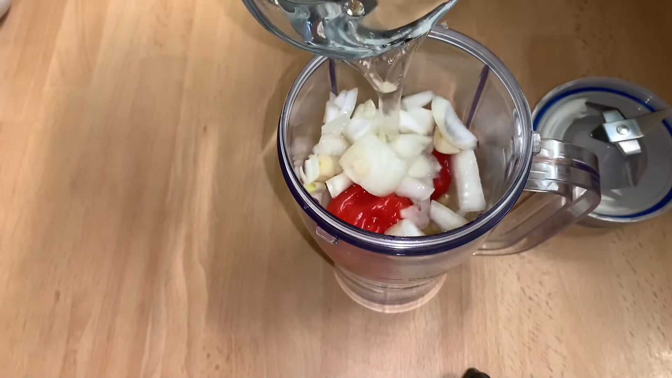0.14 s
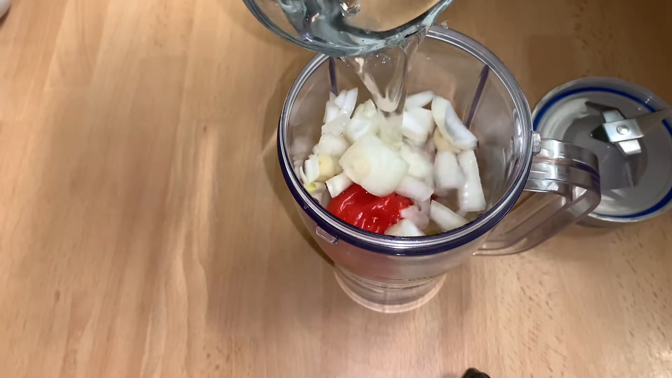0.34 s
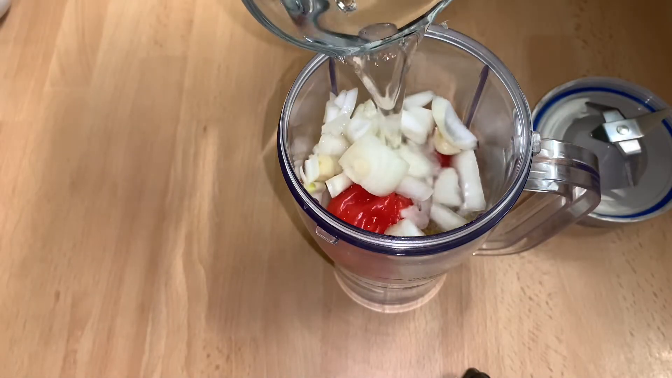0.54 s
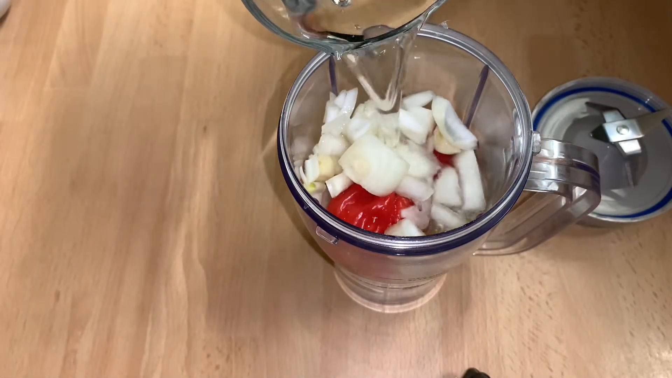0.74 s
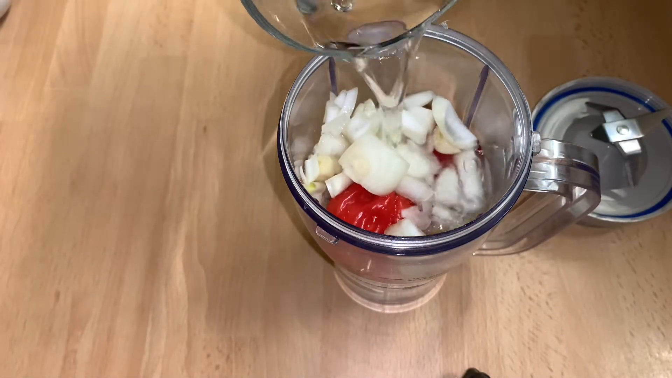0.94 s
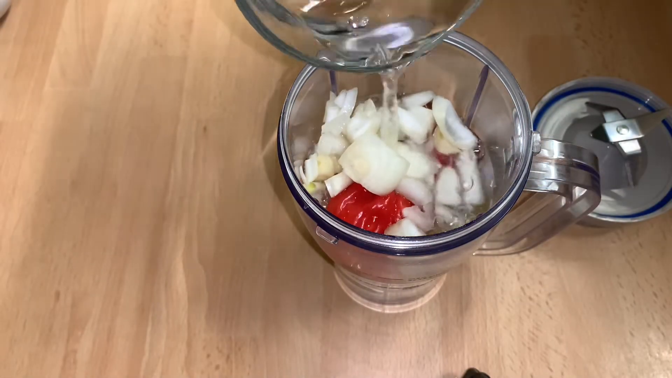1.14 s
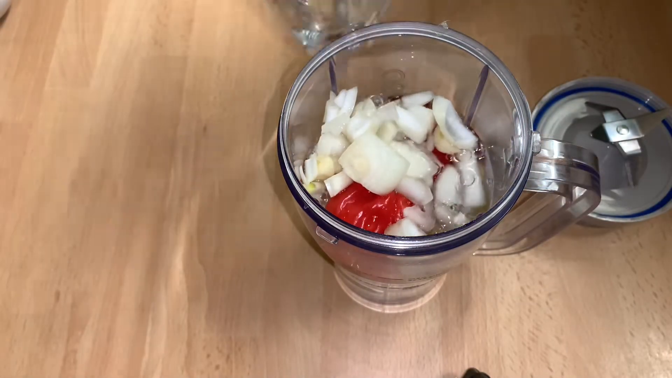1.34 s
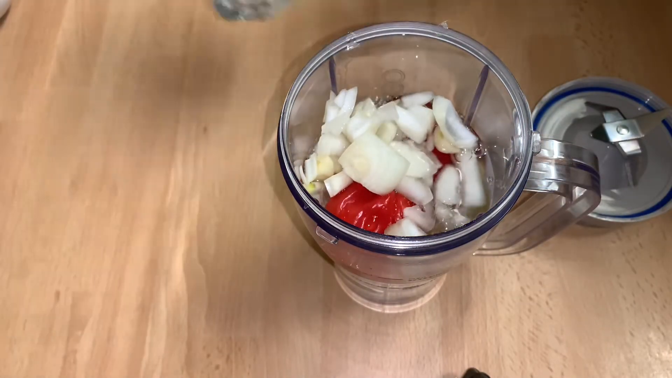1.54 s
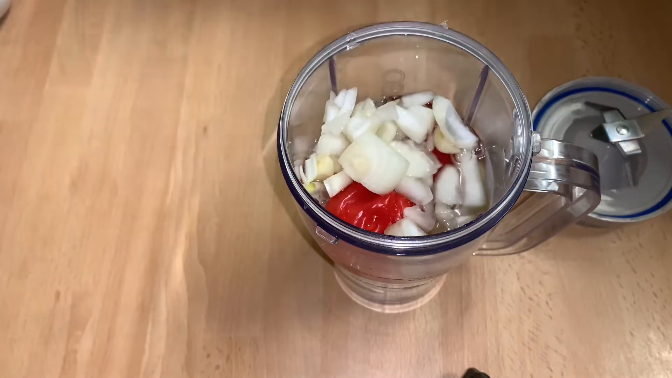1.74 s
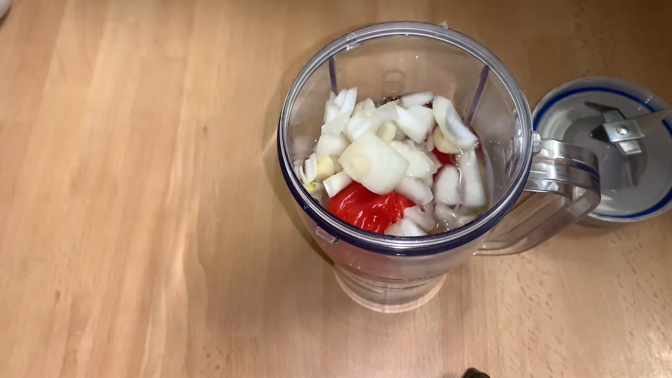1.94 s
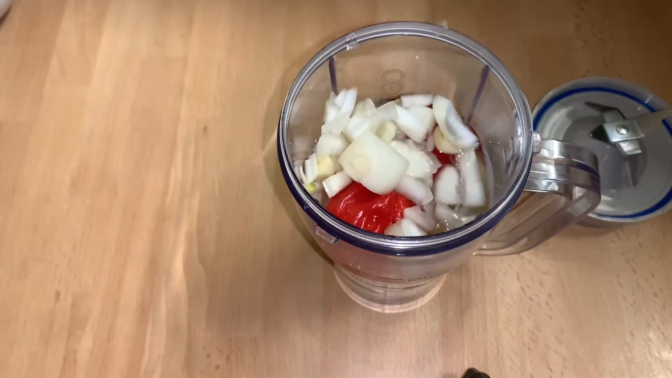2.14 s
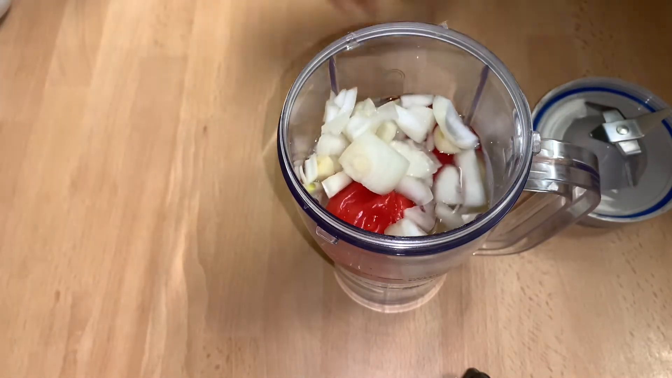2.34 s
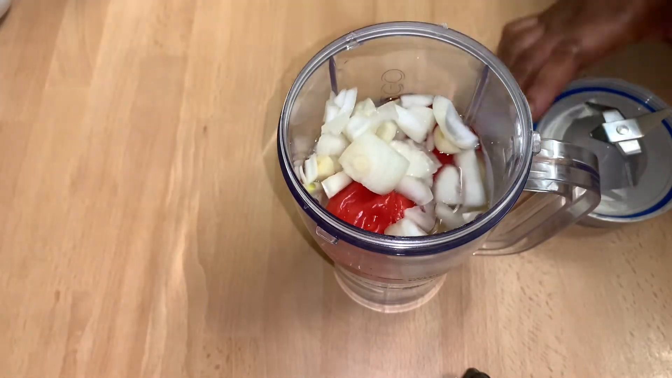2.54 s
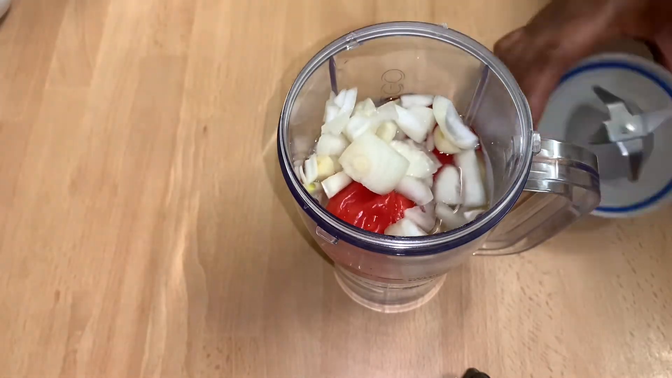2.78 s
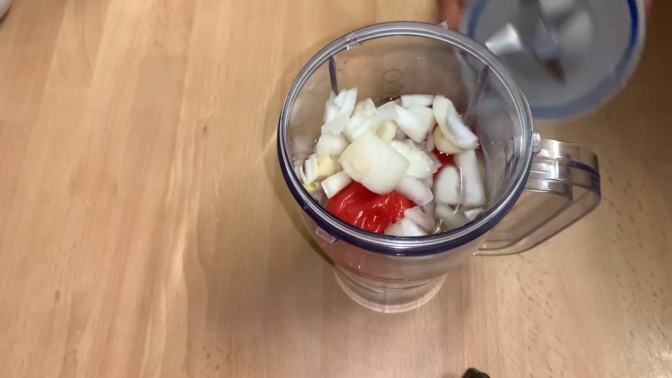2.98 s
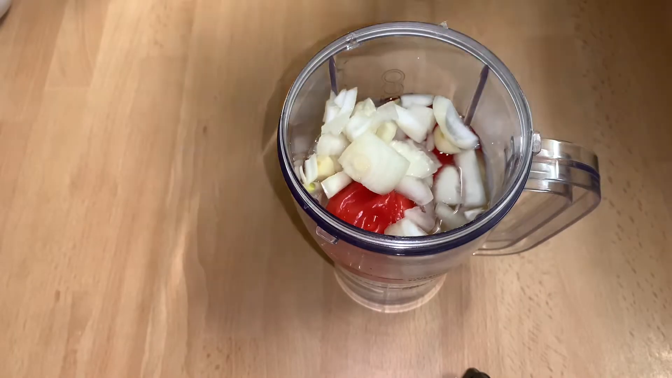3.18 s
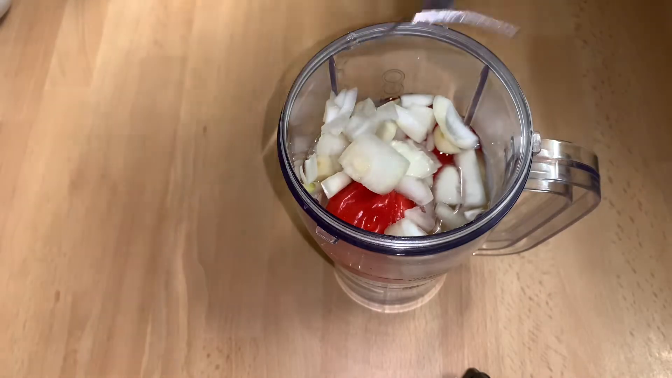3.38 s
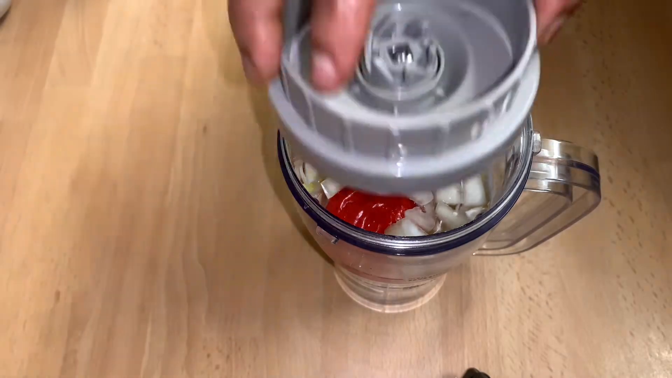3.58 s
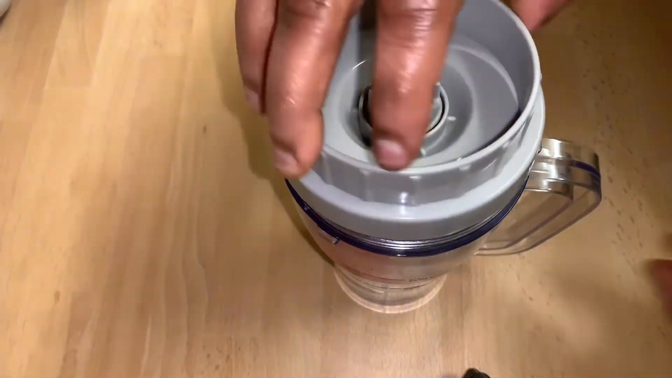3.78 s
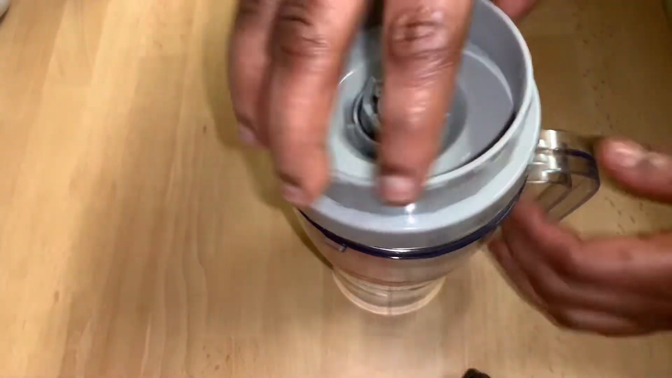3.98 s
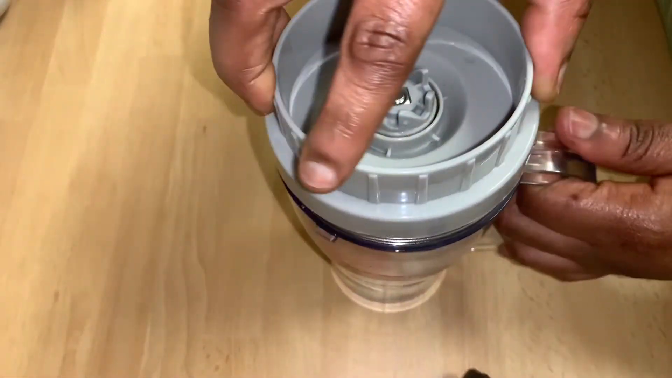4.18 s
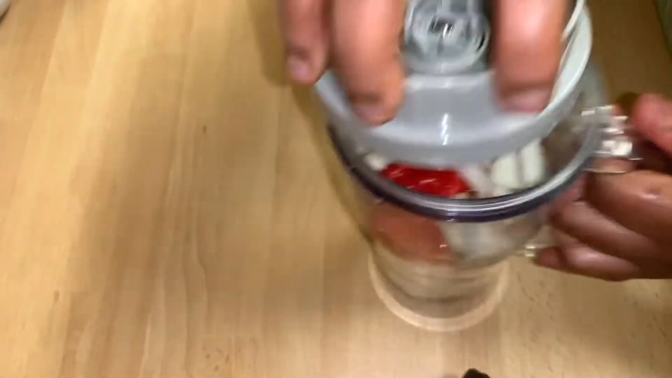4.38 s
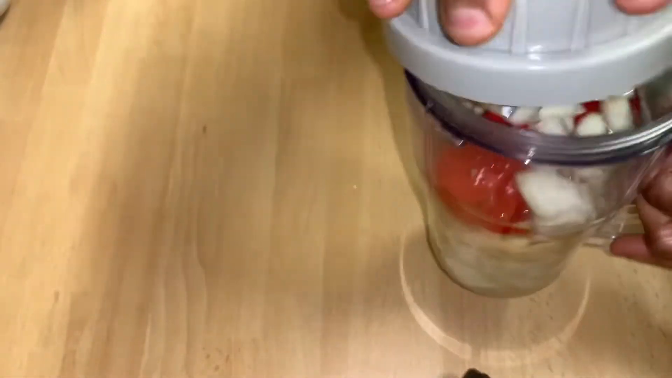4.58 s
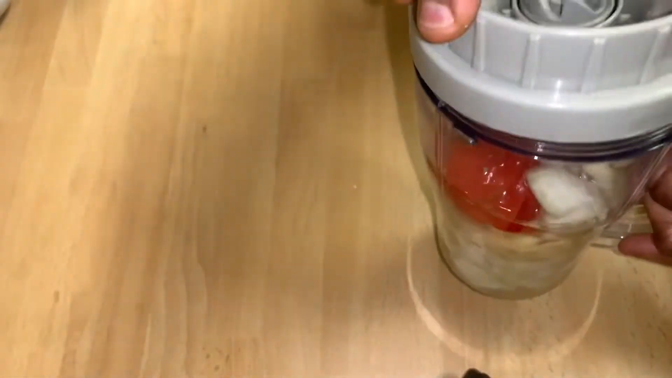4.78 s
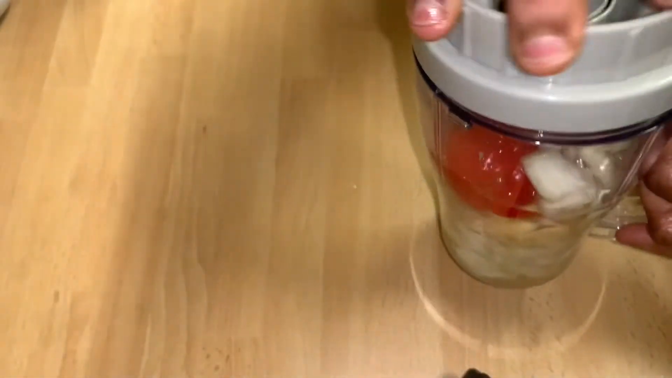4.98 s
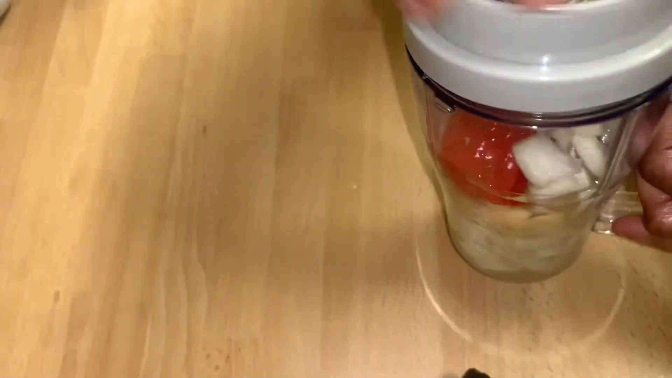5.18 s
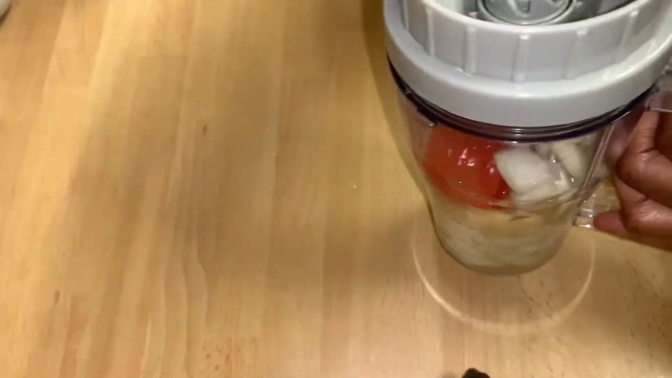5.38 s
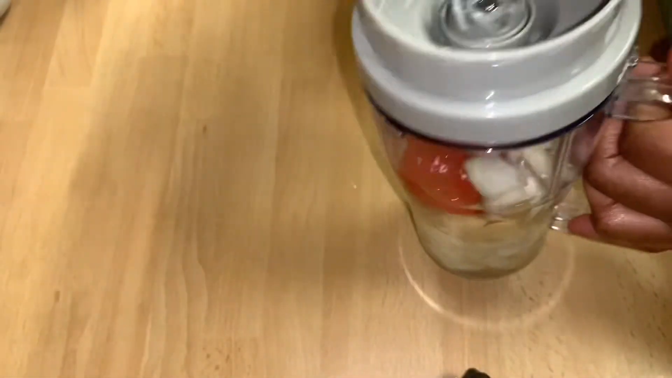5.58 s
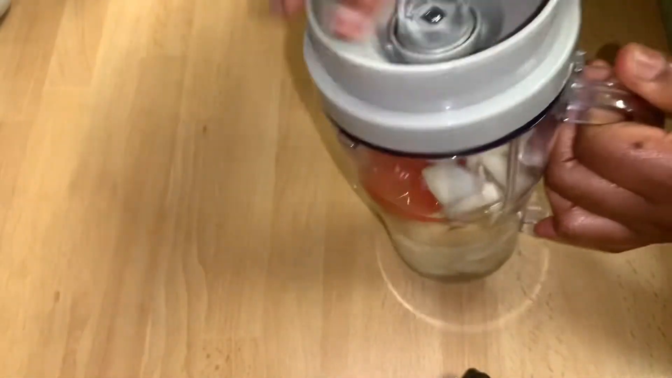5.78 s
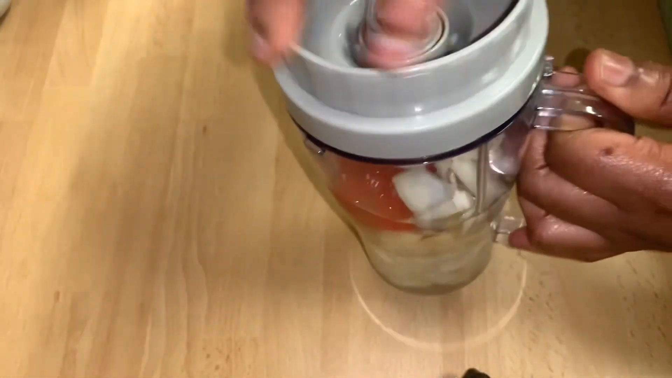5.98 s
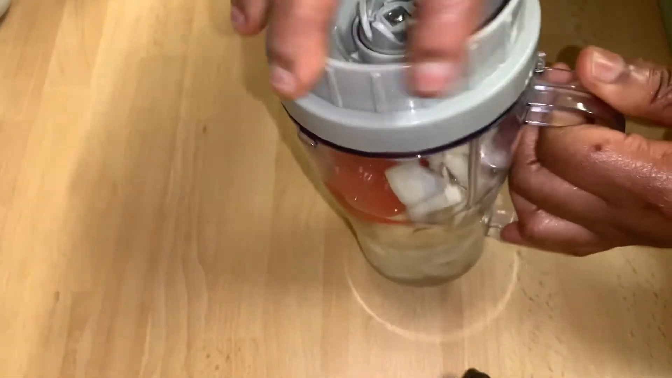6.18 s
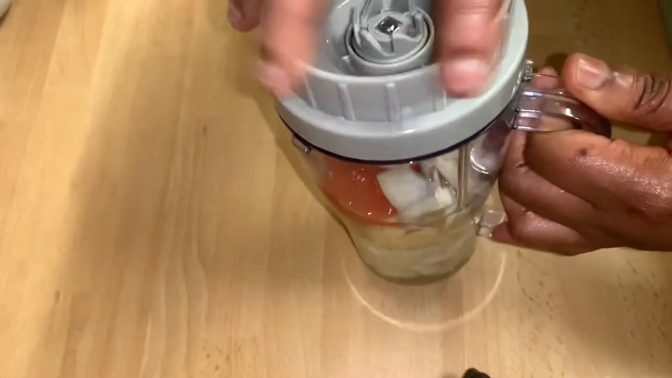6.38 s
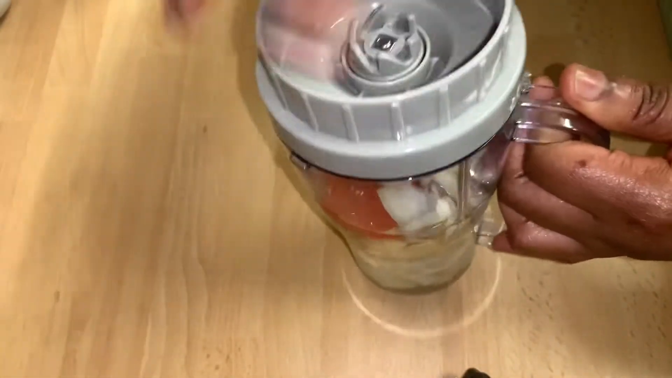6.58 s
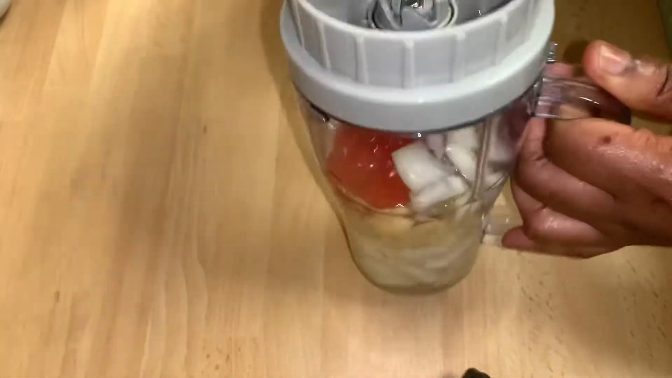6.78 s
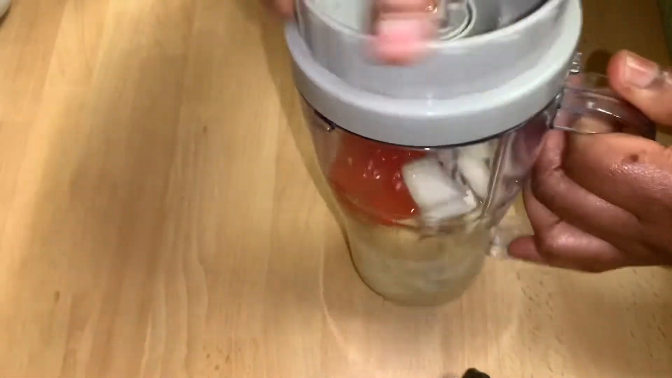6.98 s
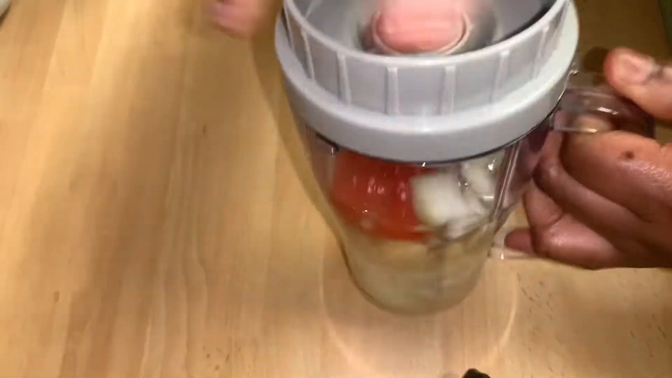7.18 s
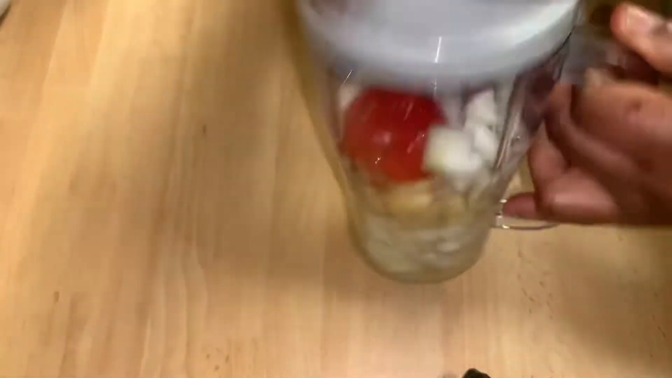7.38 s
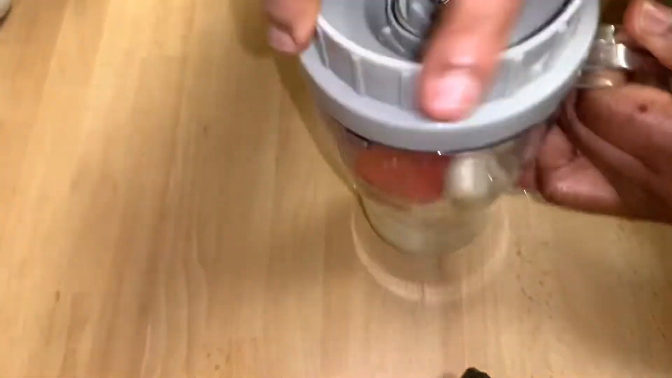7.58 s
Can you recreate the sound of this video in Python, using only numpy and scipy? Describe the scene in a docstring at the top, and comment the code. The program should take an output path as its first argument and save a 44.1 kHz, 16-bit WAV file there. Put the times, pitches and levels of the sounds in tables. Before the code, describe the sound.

A quiet kitchen with soft low rumble and barely audible hum, heard close by a phone above the counter. From 0 to about 1.3 seconds, water trickles faintly into a plastic jar over chopped vegetables, with small hollow bubbles and tiny bright splashes. At 1.9 a glass bowl lands hard on the wooden counter: a double thud, quick rocking rattle, deep cupboard boom and faint glassy ring. At 2.7 the plastic blender base gives a sharp hollow clack with a short scuff. From 3.4 to 4.0 it knocks onto the jar, loudest near 3.6, with counter bumps. Rasps, clicks and thumps continue, with crisp snaps at 4.3 and a hard clack at 4.53. From 5.1 to 7.0, short bright hissing turns with small catches come in separate strokes, with a tick at 5.4. A final cluster of clicks and a light scuff comes near 7.3.

```python
"""Bowl emptied into a blender jar, blade base screwed on

Water trickles from a glass bowl over chopped vegetables in a plastic jar: rising chirps over shaped noise.
The bowl lands hard on a wooden counter: pushes ring wood and glass modes, and the cupboards boom as filtered noise.
The blade base knocks on the jar (struck modes, noise bursts) and is screwed on in short hissing turns (gated noise).
A quiet kitchen, noise and a faint hum, lies behind; a phone with two microphone ports listens from above."""
import sys
import numpy as np
from scipy import signal
from scipy.fft import rfft, irfft, next_fast_len
from scipy.io import wavfile
from scipy.ndimage import map_coordinates

SR = 44100
rng = np.random.default_rng(int(sys.argv[2]) if len(sys.argv) > 2 else 0)


def digitize_waveform(pressure):
    """Quantize a signal to 16-bit integers and store it at the path in sys.argv[1].

    Rows of a 2-D input are taken as channels; values are limited to [-1, 1].
    """
    field = np.atleast_2d(pressure).T
    bounded = np.clip(field, -1, 1)
    quanta = np.round(bounded * 32767).astype(np.int16)
    wavfile.write(sys.argv[1], SR, quanta)


N = 336483

# Bowl landing and rocking. Each row: start in seconds, relative blow in dB, nominal contact in ms.
LANDINGS = [(1.881, -40, 0.5), (1.89, -21, 0.5), (1.895, -4, 0.33), (1.901, -7.5, 0.63), (1.922, -13, 0.8),
            (1.936, -13, 0.5), (1.944, -23.5, 0.32), (1.951, -23.5, 0.49), (1.967, -27, 1.6),
            (1.973, -24, 0.34), (2.006, -36, 1.5)]
# Modes of jar and base. Each row: frequency in Hz, relative level in dB, undamped-by-grip t60 in seconds.
SHELL_MODES = [(464, -8, 0.068), (550, -5, 0.094), (643, -2.5, 0.11), (756.6, -1.5, 0.076),
               (934, -0.5, 0.07), (1068, -1.5, 0.044), (1263, 5.5, 0.036), (1507.5, 1, 0.05),
               (1713, 5, 0.048), (2066, -3, 0.015), (2665, -6, .02)]
# Bright hiss spectrum. Each row: frequency in Hz, relative density in dB per Hz.
HISS_SPECTRUM = [(6000, -60), (7600, -38.5), (8100, -5.5), (9500, -4), (11000, -6.5), (13000, -6.5),
                 (15500, -13)]
# Snap spectrum. Each row: frequency in Hz, relative density in dB per Hz.
SNAP_SPECTRUM = [(1500, -24), (2300, -4), (4200, 0), (5300, -5), (6800, -2), (8000, -8), (9500, -30)]
SHELL_LOW_HZ, KNOCK_PAN_DB = 430, -5


def amp(db):
    """Decibels to amplitude."""
    return 10 ** (np.asarray(db) / 20)


def unit(x):
    """Scales to rms 1."""
    return x / np.sqrt(np.mean(x ** 2) + 1e-20)


def peaked(x):
    """Scales to peak 1."""
    return x / np.abs(x).max()


def along(points, hz):
    """Interpolates (Hz, value) points on a log axis."""
    f, v = np.transpose(points)
    return np.interp(np.log(hz + 1), np.log(f + 1), v)


def shaped(points):
    """Zero-phase response through (Hz, dB) points."""
    return lambda hz: amp(along(points, hz))


def curves(rows):
    """One gain per sample for each dB column; silent outside the table."""
    s, *cols = np.transpose(rows)
    t = np.arange(N) / SR
    return [amp(np.interp(t, s, c, left=-150, right=-150)) for c in cols]


def wobble(rate_hz):
    """Smooth random curve, rate_hz knots a second."""
    knots = rng.standard_normal(int(N * rate_hz / SR) + 4)
    return map_coordinates(knots, [np.arange(N) * rate_hz / SR])


def filtered(x, response):
    """x times a complex response of frequency."""
    n = x.shape[-1]
    m = next_fast_len(n + 4096)
    return irfft(rfft(x, m) * response(np.fft.rfftfreq(m, 1 / SR)), m)[..., :n]


def hollow(peaks):
    """Causal resonances from (Hz, width Hz, dB) rows, summed with alternating sign."""
    def response(f):
        total = 0
        for k, (centre, width, db) in enumerate(peaks):
            resonance = 1j * f * width / (centre * centre - f * f + 1j * f * width)
            total = total + (-1) ** k * amp(db) * resonance
        return total
    return response


def rush(response, alike, grain_db, rate_hz, slips=0, slip_rate_hz=100):
    """Stereo noise of rms 1, partly shared by the ports, roughened by level grain and by separate small slips."""
    top_hz = 15750
    shared, left, right = rng.standard_normal((3, N))
    pair = alike * shared + np.sqrt(1 - min(alike, 1) ** 2) * np.array([left, right])
    impulses = unit(1. * (rng.random(N) < slip_rate_hz / SR))
    pair = pair * (1 + slips * impulses) * amp(grain_db * wobble(rate_hz))
    return unit(filtered(pair, lambda hz: response(hz) * (hz < top_hz)))


def burst(rise_s, t60_s, seconds=.08):
    """Noise with a quick rise and an exponential fall."""
    t = np.arange(round(seconds * SR)) / SR
    return rng.standard_normal(len(t)) * (1 - np.exp(-t / rise_s)) * amp(-60 * t / t60_s)


def ring(modes, seconds, scatter_db, detune, damping=1):
    """Struck modes, each at a new strength and slightly off pitch."""
    t = np.arange(round(seconds * SR)) / SR
    hz, db, t60_s = np.transpose(modes)[:, :, None]
    luck = rng.standard_normal((2, len(modes), 1))
    envelopes = amp(db + scatter_db * luck[0] - 60 * t * damping / t60_s)
    return np.sum(envelopes * np.sin(2 * np.pi * hz * (1 + detune * luck[1]) * t), 0)


def chirp(hz, cycles, rise):
    """Soft-starting, dying tone; its pitch rises, or falls if rise is negative."""
    t = np.arange(round(3 * cycles / hz * SR)) / SR
    u = t * hz / cycles
    return u * np.exp(1 - u * 1.99) * 2 * np.sin(2 * np.pi * hz * t * (1 + rise * u))


def add(out, s, x, pan_db=0, lead_ms=0):
    """Adds a sound at both ports; positive pan is louder left, positive lead is earlier left."""
    for side, sign in enumerate((1, -1)):
        at = max(round((s - sign * lead_ms / 2000) * SR), 0)
        out[side, at:at + len(x)] += (amp(sign * pan_db / 2) * x)[:N - at]


def kitchen():
    """Far traffic rumble, appliance hum and the ports' own hiss: drifting shaped noise and a wavering sine."""
    # Each row: frequency in Hz, relative density in dB per Hz.
    background = [(20, -30), (35, -3.5), (52, -1.5), (90, -11.5), (180, -17), (330, -25), (600, -23.5),
                  (1200, -31), (2500, -34), (4000, -35.5), (6000, -36.5), (8500, -33.5), (12000, -34.5),
                  (15500, -36.5)]
    hum = amp(-84.5 + 2.5 * wobble(13)) * np.sin(2 * np.pi * 183 * np.arange(N) / SR)
    drift_db = 0.5 * wobble(1.6)
    return amp(-68.5 + drift_db) * rush(shaped(background), 0.85, grain_db=1.3, rate_hz=9.7) + hum


def water():
    """Fizz and gurgle follow the flow; bubbles ring near the jar's air tone, splashes spit in the treble."""
    # Each row: time in seconds, relative fizz in dB, relative gurgle in dB.
    flow = [(0.0, -62.5, -52.5), (0.17, -87, -76), (0.248, -69, -63), (0.352, -62.5, -57.5),
            (0.53, -75, -61), (0.58, -77, -77), (0.698, -67, -61.5), (0.978, -77, -69.5), (1.098, -71, -72),
            (1.22, -64, -67), (1.26, -53, -77), (1.33, -67, -99), (1.632, -99, -77), (1.86, -92, -72)]
    # Loudest bubbles ringing in the jar. Each row: start in seconds, relative level in dB, pitch in Hz.
    bubbles = [(0.019, -60, 1000), (0.154, -55, 990), (0.282, -51, 980), (0.282, -51, 510),
               (0.366, -41, 2210), (0.38, -56, 1110), (0.436, -46, 2300), (0.446, -52, 1140),
               (0.332, -63, 1150), (0.347, -46.5, 1220), (0.364, -51, 1080), (0.417, -49, 1100),
               (0.439, -53, 1020), (0.468, -54, 1260), (0.496, -47, 1110), (0.531, -46, 1160),
               (0.564, -54, 1070), (0.6, -42, 1027), (0.663, -48, 2140), (0.712, -49, 1050),
               (0.745, -56, 1130), (0.762, -53, 1230), (0.816, -36, 1053), (0.87, -55, 1140),
               (0.882, -52, 1060), (0.942, -54, 1200), (0.994, -59, 510), (1.029, -59, 614),
               (1.008, -42.5, 1030), (1.031, -49, 1085), (1.168, -58, 1050), (1.2, -65, 510),
               (1.259, -50.5, 1060), (1.26, -48.5, 1700)]
    # Loudest splashes on the vegetables. Each row: start in seconds, relative level in dB, pitch in Hz.
    splashes = [(0.0912, -53, 10800), (.2423, -57, 10200), (.2683, -49, 7120), (0.2997, -43, 11140),
                (0.345, -39, 8200), (0.373, -49.5, 6100), (.4439, -51, 11000), (.4678, -31.5, 8250),
                (0.4948, -48, 5950), (.7617, -46, 14300), (0.8653, -41, 11400), (0.8939, -43.5, 10800),
                (0.9417, -46, 15000), (1.0323, -40.5, 10700), (1.0722, -51, 11400), (1.14, -56, 4350),
                (1.1685, -51, 10300), (1.2437, -48, 4630), (1.282, -50, 3740), (1.4561, -52, 10300)]
    # Spectra of fizz and of splash spit. Each row: frequency in Hz, relative density in dB per Hz.
    fizz_spectrum = [(1500, -8.5), (2500, -21), (4000, -2), (6500, -8), (9000, -10), (12000, -11.5),
                     (15500, -9)]
    click_spectrum = [(1200, -29), (2500, 11), (4500, 3), (7000, 18.5), (10000, 26.5), (13000, 21),
                      (16500, 13)]
    # Air above the water. Each row: frequency in Hz, width in Hz, relative level in dB.
    air = [(583, 330, -10), (1090, 96, 1), (1256, 200, -9), (1660, 67, -3), (2220, 130, -8)]
    speck_db, speck_spread_db, speck_low_hz, speck_octaves = -1, 6, 2201, 2.7
    speck_span_s, bubble_span_s = 1.2, 1.4

    out = np.zeros((2, N))
    fizz, gurgle = curves(flow)
    for s, db, hz in bubbles:
        add(out, s, amp(db - 6.0) * chirp(hz, 4.6, 0.027), pan_db=-1.5, lead_ms=0.15)

    for where, size, pitch in rng.random((450, 3)):  # small random splashes over the fizz
        s = where * speck_span_s
        level = fizz[int(s * SR)] * amp(speck_db - speck_spread_db * np.log(size + 0.023))
        add(out, s, level * chirp(speck_low_hz * 2 ** (speck_octaves * pitch), 3.1, 0.061), lead_ms=0.12)

    t = np.arange(SR // 40) / SR
    for s, db, hz in splashes:
        spit = filtered(rng.standard_normal(len(t)) * amp(-60 * t / 0.027), shaped(click_spectrum))
        add(out, s, amp(db) * peaked(spit), lead_ms=.13)
        add(out, s, amp(db) * chirp(hz, 11.7, 0.016), lead_ms=0.2)

    small = np.zeros((2, N))
    for where, size, pitch in rng.random((700, 3)):  # small random bubbles, heard through the jar's air
        s = where * bubble_span_s
        level = gurgle[int(s * SR)] * amp(-2.0 - 3.5 * np.log(size + 0.04))
        add(small, s, level * chirp(900 * 2 ** (1.5 * pitch), 2.5, .05), lead_ms=.13)

    spray = amp(-1.0) * rush(shaped(fizz_spectrum), 0.27, 6.8, 60)
    gurgling = 0.46 * gurgle * rush(hollow(air), 0.3, 5.7, 51)
    return out + fizz * spray + filtered(small, hollow(air)) + gurgling


def strokes():
    """Hiss, rasp and shell gains: each stroke rises, holds while its level slides, stops and trails off softly."""
    # Strokes of fingers, seal and thread. Each row: start in seconds, hold in seconds, fall over the hold in dB,
    # then relative hiss, rasp and shell in dB.
    stroke_rows = [(1.601, 0.13, -0.5, -95, -89.5, -80.5), (2.174, 0.35, -0.5, -83, -79, -83),
                   (2.553, 0.044, -1.5, -74.5, -66, -73.5), (2.632, 0.08, 8, -95, -83, -64),
                   (2.734, 0.03, 7, -84, -82, -52), (2.88, 0.024, -2.5, -80.5, -68.5, -74),
                   (3.352, 0.098, -6.5, -74.5, -69, -86), (3.605, 0.065, 8, -55, -53, -71),
                   (3.75, 0.08, 4, -81, -66, -58.5), (3.915, 0.011, 1, -59, -53.5, -51),
                   (4.02, 0.035, -2.5, -57, -54.5, -58.5), (4.167, 0.041, -2.5, -60, -56.5, -50),
                   (4.232, 0.11, -2, -58, -55, -52.5), (4.372, 0.11, 19.5, -55, -52, -54),
                   (4.501, 0.062, -5.5, -57.5, -56, -54.5), (4.602, 0.026, -5.5, -69, -70, -60),
                   (4.68, 0.015, 18, -71, -46, -77), (4.816, 0.0081, -4.5, -52.5, -57.5, -58.5),
                   (4.872, 0.051, 4.5, -59, -81, -66.5), (5.093, 0.12, 4, -36, -65, -59.5),
                   (5.44, 0.13, 12.5, -37.5, -67.5, -61.5), (5.69, 0.099, 11, -38.5, -57.5, -62.5),
                   (5.923, 0.021, 0.5, -45, -62, -62.5), (6.147, 0.045, 0, -44, -73, -62.5),
                   (6.388, 0.02, -3.5, -37, -71.5, -54), (6.62, 0.027, -5, -42.5, -75, -55),
                   (6.922, 0.041, 2.5, -47, -80.5, -74), (7.164, 0.041, 3.5, -78.5, -74.5, -82.5),
                   (7.241, 0.077, -7, -61.5, -66, -62), (7.389, 0.054, -1.5, -49, -81, -96)]
    # How closely hiss, rasp and shell follow a stroke's edges. Each row: one exponent.
    edge_exponents = [
        [1],
        [0.93],
        [0.61],
    ]
    rise_db_per_s, fall_db_per_s, tail_db, tail_db_per_s = 706, 489, -30, 161

    t, power = np.arange(0, N, 64) / SR, 0
    for s, hold_s, fade_db, *levels_db in stroke_rows:
        after = np.maximum(t - s - hold_s, 0)
        shape = amp(-rise_db_per_s * np.maximum(s - t, 0) - fade_db * np.clip((t - s) / hold_s, 0, 1))
        shape = shape * np.maximum(amp(-fall_db_per_s * after), amp(tail_db - tail_db_per_s * after))
        power = power + (amp(levels_db)[:, None] * shape ** np.array(edge_exponents)) ** 2
    return [np.interp(np.arange(N) / SR, t, np.sqrt(p)) for p in power]


def open_shell():
    """Slips ring each mode of the open shell, most those near the spot being rubbed."""
    # Where the slips ring. Each row: time in seconds, spot frequency in Hz.
    slide_spot = [(2.6, 806), (2.8, 1100), (3.7, 700), (4.17, 674), (4.25, 950), (4.45, 940), (4.5, 1170),
                  (4.6, 760), (4.8, 1240)]
    slope_db_per_octave = 21.5
    spot_hz = np.interp(np.arange(N) / SR, *np.transpose(slide_spot))
    gains = np.array([amp(db - slope_db_per_octave * abs(np.log2(hz / spot_hz)))
                      for hz, db, _ in SHELL_MODES])[:, None]

    def each(f):
        return np.array([[hollow([(hz, 1.8 / t60_s, 10 * np.log10(t60_s))])(f)]
                         for hz, _, t60_s in SHELL_MODES])

    modes = rush(each, 0.6, 2.2, 40, slips=0.45, slip_rate_hz=300)
    return np.sum(gains * modes, 0) / np.sqrt(np.sum(gains ** 2, 0))


def sliding():
    """Rubber seal and thread hiss, skin and plastic rasp in small slips, the shell resonates, the counter rumbles."""
    # Jar rocking on the counter. Each row: time in seconds, rumble in dB.
    rocking = [(2.55, -73.5), (2.68, -69), (2.9, -83), (3.4, -76), (3.46, -50), (3.7, -41), (3.86, -51),
               (3.97, -45.5), (4.11, -58), (4.2, -41), (4.36, -65), (4.7, -53.5), (4.95, -99), (5.35, -102),
               (5.75, -67.5), (6.02, -91), (7.14, -98), (7.26, -57), (7.4, -91)]
    # Spectra of rasp, seal rasp and rumble. Each row: frequency in Hz, relative density in dB per Hz.
    rasp_spectrum = [(1500, -7.5), (2300, -6.5), (3800, -3.5), (5200, -15.5), (6500, -2), (7800, -5.5),
                     (9000, -29)]
    seal_spectrum = [(1800, -16), (2600, -17.5), (3800, -9), (4500, -8), (5200, -16.5), (5700, -3),
                     (6300, 0.5), (7100, -7.5), (7600, -16), (9000, -49)]
    rumble_spectrum = [(25, -40), (45, -12), (85, -16), (145, 0), (190, -3), (300, -14), (600, -40)]
    # Rubbed plastic, then the closed jar. Each row: frequency in Hz, width in Hz, relative level in dB.
    rub_peaks = [(2730, 100, -17), (4090, 650, 7), (5100, 500, 0), (6220, 300, 6), (6800, 570, 1)]
    sealed_peaks = [(585, 77, -5.5), (715, 45, -5), (1046, 42, -3), (1359, 83, -2), (1721, 59, -1.5)]
    # The seal catches and lets go. Each row: start in seconds, peak in dB.
    catch_rows = [(5.14, -47), (5.164, -44.5), (5.187, -45.5), (5.439, -41.5), (5.723, -52.5), (5.932, -50),
                  (6.139, -49.5), (6.166, -47.5), (6.334, -60.5), (6.37, -58), (6.409, -49), (6.431, -43.5),
                  (6.574, -35.5), (6.644, -57), (6.674, -57)]
    sealed_from_s, slip_top_hz = 5.0, 2040
    sealed_db, seal_rasp_db, rub_db = -1, 2.5, -3

    def closed(f):
        top_cut = 1 + (f / slip_top_hz) ** 5
        low_cut = 1 + (SHELL_LOW_HZ / (f + 1)) ** 6
        return hollow(sealed_peaks)(f) / top_cut / low_cut

    (hiss, rasp, shell), (rumble,) = strokes(), curves(rocking)
    is_open = np.arange(N) < sealed_from_s * SR

    rub = rush(shaped(rasp_spectrum), .5, 2.5, 150, slips=.7, slip_rate_hz=300)
    rub = rub + amp(rub_db) * rush(hollow(rub_peaks), .6, 3.2, 60, slips=.45, slip_rate_hz=400)
    seal_rasp = amp(seal_rasp_db) * rush(shaped(seal_spectrum), 0.56, 3.3, 45, slips=0.27, slip_rate_hz=270)
    grit = np.where(is_open, unit(rub), seal_rasp)

    closed_slips = amp(sealed_db) * rush(closed, 0.85, 2.9, 50, slips=0.97, slip_rate_hz=130)
    slips = np.where(is_open, open_shell(), closed_slips)

    catches = np.zeros((2, N))
    for s, db in catch_rows:
        add(catches, s, amp(db) * peaked(filtered(burst(0.00057, 0.011, seconds=.06), closed)), lead_ms=.15)

    hissing = hiss * rush(shaped(HISS_SPECTRUM), 0.95, 2.0, 300)
    rumbling = rumble * rush(shaped(rumble_spectrum), 0.87, 6.1, 6.7)
    return hissing + rasp * grit + shell * slips + catches + rumbling


def bowl():
    """Each landing pushes the counter with a smooth pulse and shakes what stands on it; the glass rings on."""
    # Counter top under the bowl. Each row: frequency in Hz, relative level in dB, t60 in seconds.
    counter = [(120.1, 1, 0.16), (179.3, -2, 0.21), (377.5, -9, 0.11), (433.8, -12, 0.26),
               (484, -15.5, 0.11), (545, -14.5, 0.19), (647, 0.5, 0.069), (722, 3.5, .12), (813, -11, .12),
               (958, -10.5, 0.21), (1058, 0, .12), (1440, -5.5, 0.037), (1730, -10.5, 0.11),
               (2290, -8.5, 0.075)]
    # Glass, close pairs beating. Each row: frequency in Hz, relative level in dB, t60 in seconds, landing index.
    glass_modes = [(2446, -44, .36, 4), (2457, -44.3, .36, 4), (3745, -38, .36, 2), (3712, -51, .3, 2),
                   (3190, -40, .09, 2), (2690, -38, .1, 2)]
    # Loose things on the counter. Each row: frequency in Hz, relative density in dB per Hz.
    clatter = [(150, -20), (400, -3), (700, 0), (1200, -5), (2200, -13), (3500, -27), (7000, -46),
               (14000, -70)]
    wood_top_hz, glass_db, glass_rise_s = 7500, 3.5, 0.0012

    out = np.zeros((2, N))
    deep = [mode for mode in counter if mode[0] < 500]
    for s, db, contact_ms in LANDINGS:
        push = np.hanning(round(contact_ms * SR / 1000) + 3)
        push = amp(db - 12.0) * push / push.sum()
        add(out, s, np.convolve(ring(deep, 0.55, 2.7, 0.025), push), lead_ms=0.03)
        add(out, s, np.convolve(ring(counter[len(deep):], .5, 4.0, 0.016), push), lead_ms=-0.41)
        shaken = filtered(burst(0.0019, 0.088, seconds=.4), shaped(clatter))
        add(out, s, amp(db + 6) * shaken, lead_ms=-0.14)
        snap = peaked(filtered(burst(0.00078, 0.036), shaped(SNAP_SPECTRUM)))
        add(out, s, amp(db - 27.0) * snap / contact_ms, lead_ms=-0.073)
    out = filtered(out, lambda hz: 1 / (1 + 1j * hz / wood_top_hz))  # the landing grows gently duller above 7.5 kHz

    for s, db, _ in LANDINGS:  # the glass edge ticks brightly
        add(out, s, amp(db - 35.0) * peaked(filtered(burst(0.001, 0.05), shaped(HISS_SPECTRUM))))
    for k, (*mode, landing) in enumerate(glass_modes):  # neighbours start in opposition
        glass = (-1) ** k * ring([mode], .6, 0, 0)
        onset = 1 - np.exp(-np.arange(len(glass)) / SR / glass_rise_s)
        add(out, LANDINGS[landing][0], amp(glass_db) * glass * onset, lead_ms=-.1)
    return out


def cupboards():
    """The hollow cupboards under the counter boom after the bowl's hardest landing, differently at each port."""
    # Each row: frequency in Hz, relative density in dB per Hz.
    boom = [(35, -43), (50, -8), (66, 4.5), (85, -4.5), (130, -13.5), (220, -47), (600, -120)]
    out = np.zeros((2, N))
    shared, left, right = (filtered(burst(0.00077, 0.41, seconds=.8), shaped(boom)) for _ in range(3))
    at = round(LANDINGS[2][0] * SR)
    out[:, at:at + len(shared)] = amp(-21) * peaked(shared + 0.64 * np.array([left, right]))
    return out


def walls(x):
    """Each frequency of the kitchen's answer dies at its own speed; only the bass is alike at both ports."""
    # Each row: frequency in Hz, t60 in seconds.
    room_t60 = [(100, .38), (600, .3), (2000, .33), (6000, .27), (14000, .17)]
    hz, t, z = signal.stft(rng.standard_normal((2, SR // 2)), SR, nperseg=256)
    apart = (1 / (1 + (420 / (hz + 1)) ** 3))[:, None]
    z = np.array([z[0] + apart * z[1], z[0] - apart * z[1]]) / np.sqrt(1 + apart ** 2)
    decay = amp(-60 * t / along(room_t60, hz)[:, None])
    tail = signal.istft(z * decay, SR, nperseg=256)[1]
    tail[:, :200] = 0  # samples before the first echo
    return signal.fftconvolve(x.mean(0)[None], tail / np.linalg.norm(tail[0]), axes=1)[:, :N]


def dragging():
    """Plastic dragged over the counter: a low scuff that swells while the base or the jar slides."""
    # Each row: time in seconds, level in dB.
    drag = [(2.52, -99), (2.6, -60), (2.66, -63), (2.72, -58), (2.85, -86.5), (7.1, -103.5), (7.2, -79),
            (7.26, -68), (7.3, -73), (7.4, -95.5)]
    # Each row: frequency in Hz, relative density in dB per Hz.
    scuff = [(120, -23), (220, -6.5), (350, 5.5), (550, -6), (900, -28), (2000, -47)]
    return curves(drag)[0] * rush(shaped(scuff), 0.92, 4, 40)


def knocks():
    """Plastic on plastic: shell modes near the spot struck, a dry clack, a counter thump, a snap and a bright tick."""
    # Each row: start in seconds, then relative shell, thump, snap and tick in dB, spot struck in Hz.
    knock_rows = [(2.655, -44.5, -66, -76, -84, 970), (2.706, -32.5, -68, -58, -81, 1000),
                  (2.714, -25.5, -41, -36, -54.5, 1970), (2.724, -29, -31, -36, -77, 700),
                  (2.736, -29, -33.5, -43, -75, 1284), (3.414, -32, -44, -38.5, -47, 1500),
                  (3.419, -27.5, -32.5, -32.5, -45.5, 1720), (3.425, -38, -35, -49, -69, 786),
                  (3.44, -46, -35.5, -64, -63.5, 450), (3.462, -69, -34, -68.5, -79, 450),
                  (3.505, -66, -36, -61, -89, 601), (3.553, -31.5, -34, -40, -57, 920),
                  (3.568, -28, -26, -45.5, -48.5, 950), (3.597, -20, -17, -28.5, -30, 1160),
                  (3.611, -20, -20, -51, -50, 607), (3.646, -30, -40, -56, -62.5, 1270),
                  (3.656, -27.5, -26, -59, -65, 690), (3.709, -58, -27.5, -55, -61, 653),
                  (3.745, -68, -37, -73.5, -77, 600), (3.808, -50.5, -57, -54, -76, 537),
                  (3.9, -37.5, -37.5, -66, -64.5, 710), (3.915, -39.5, -26, -60.5, -72, 674),
                  (3.934, -32.5, -24.5, -49.5, -56.5, 700), (3.949, -38, -38, -65, -65.5, 625),
                  (4.081, -58, -39.5, -69, -63.5, 533), (4.156, -50, -19, -43.5, -62.5, 595),
                  (4.178, -36.5, -28.5, -43, -53, 560), (4.191, -36, -27.5, -40, -66, 700),
                  (4.206, -52, -46, -40.5, -64, 600), (4.224, -57.5, -40, -60.5, -69.5, 998),
                  (4.265, -47, -36.5, -55, -70.5, 922), (4.324, -30, -73, -16, -23.5, 1690),
                  (4.333, -46.5, -36, -29, -50.5, 940), (4.386, -31, -47.5, -19, -36, 1050),
                  (4.529, -37, -74, -54, -56, 1100), (4.539, -21, -60, -38.5, -56, 1400),
                  (4.535, -18.5, -66, -27.5, -34, 980), (4.559, -64, -40, -37, -48, 692),
                  (4.672, -36.5, -60, -29, -34, 1650), (4.694, -53, -46, -47, -69, 1260),
                  (4.828, -42, -43.5, -36, -30, 1284), (4.874, -42, -84, -68, -51.5, 1300),
                  (5.366, -60, -83, -60, -54.5, 1370), (5.415, -37, -84, -44, -28.5, 1195),
                  (5.865, -58.5, -53, -61, -76, 910), (5.933, -39, -50.5, -62, -51, 1760),
                  (6.568, -43.5, -65, -47.5, -37.5, 1720), (6.784, -70, -86, -61, -55, 735),
                  (7.228, -55, -65.5, -43.5, -78, 1050), (7.299, -49, -55.5, -48.5, -31.5, 970),
                  (7.307, -54, -57.5, -31, -22, 1660), (7.312, -42, -74, -43, -60, 1100)]
    # Jar bouncing on the counter. Each row: frequency in Hz, relative level in dB, t60 in seconds before damping.
    thump_modes = [(145.6, -8.5, 0.41), (186, 2.5, 0.17), (298.7, -3.5, 0.12), (390, -12, 0.15)]
    below_db_per_octave, above_db_per_octave = 11, 18  # mode fall away from the spot
    contact_cycles = 1.4  # a low spot is a slower contact
    grip_damping, thump_damping = 1.6, 1.61  # divide the modes' t60
    clack_db, clack_t60_s = -8, 0.061

    def low_cut(hz):
        return 1 / (1 + (SHELL_LOW_HZ / (hz + 1)) ** 6)

    out = np.zeros((2, N))
    for s, shell_db, thump_db, snap_db, tick_db, spot_hz in knock_rows:
        modes = []
        for hz, db, t60_s in SHELL_MODES:
            slope_db = above_db_per_octave if hz > spot_hz else below_db_per_octave
            modes.append((hz, db - abs(np.log2(hz / spot_hz)) * slope_db, t60_s))
        shell = ring(modes, .25, 3, 0.012, grip_damping)
        shell = shell * (1 - np.exp(-np.arange(len(shell)) / SR * spot_hz / contact_cycles))
        add(out, s, amp(shell_db) * peaked(filtered(shell, low_cut)), KNOCK_PAN_DB, lead_ms=0.19)

        clack = filtered(burst(0.00054, clack_t60_s, seconds=.15),
                         lambda hz: 1 / (1 + np.log2((hz + 1) / spot_hz) ** 4 * 3.3))
        add(out, s, amp(shell_db + clack_db) * peaked(clack), KNOCK_PAN_DB, lead_ms=0.11)

        push = np.hanning(round(0.003 * SR))
        thump = np.convolve(ring(thump_modes, .4, 4, 0.04, thump_damping), push / push.sum())
        add(out, s, amp(thump_db - 6.5) * thump)

        snap, tick = (burst(.0007, .022) + .18 * burst(.002, .07) for _ in range(2))
        snap = peaked(filtered(snap, shaped(SNAP_SPECTRUM)))
        add(out, s, amp(snap_db) * snap, KNOCK_PAN_DB, lead_ms=0.13)
        add(out, s, amp(tick_db + 9.0) * peaked(filtered(tick, shaped(HISS_SPECTRUM))))
    return out


def whacks():
    """Hard edge-on blows: a sharp swing of the wall, sagging in pitch, over almost at once."""
    # Each row: start in seconds, peak in dB before panning, pitch in Hz.
    whack_rows = [(2.7152, -13, 995), (3.5978, -20.5, 1092), (4.5343, -12, 974)]
    out = np.zeros((2, N))
    for s, db, hz in whack_rows:
        add(out, s, amp(db) * peaked(chirp(hz, 1.3, -0.043)), KNOCK_PAN_DB, lead_ms=.16)
    return out


def pops():
    """The wall flexes with a pop, a quick downward sweep: the treble of a bending wave arrives first."""
    # Each row: start in seconds, level in dB.
    pop_rows = [(3.552, -42), (7.298, -37.5)]
    from_hz, to_hz, length_s = 1510, 230, 0.0081
    out = np.zeros((2, N))
    u = np.arange(round(length_s * SR)) / (length_s * SR)
    hz = from_hz * (to_hz / from_hz) ** u
    sweep = np.sin(np.pi * u ** 0.63) * np.sin(2 * np.pi * np.cumsum(hz) / SR)
    for s, db in pop_rows:
        add(out, s, amp(db) * sweep, lead_ms=.1)
    return out


def scene():
    """Sums all sources; landing and hits also excite the room."""
    landing, hits = bowl(), knocks() + pops() + whacks()
    echoes = walls(amp(-8.5) * landing + amp(-12) * hits)
    return landing + hits + echoes + cupboards() + water() + sliding() + dragging() + kitchen()


def record(dry):
    """The phone shares treble between channels, left slightly late, cuts deep bass, rounds peaks and cuts the top."""
    split_hz, aligned_hz, skew_s = 6800, 6175, 0.00021
    low_cut_hz, ceiling, top_hz = 37, 1, 16800

    def high(hz):
        return 1 / (1 + (split_hz / (hz + 1)) ** 16)

    def skew(hz):  # channels in phase at aligned_hz
        return np.exp(1j * np.pi * (hz - aligned_hz) * skew_s * np.array([[-1], [1]]))

    treble = filtered(dry.mean(0), lambda hz: high(hz) * skew(hz))
    both = filtered(dry, lambda hz: 1 - high(hz)) + treble
    both = signal.sosfilt(signal.butter(6, low_cut_hz, "high", fs=SR, output="sos"), both)
    both = both / (1 + np.abs(both / ceiling) ** 6) ** (1 / 6)
    return filtered(both, lambda hz: hz < top_hz)


dry = scene()
out = record(dry)
digitize_waveform(out)
```